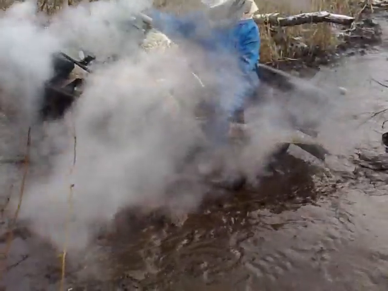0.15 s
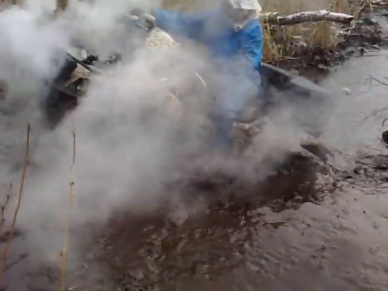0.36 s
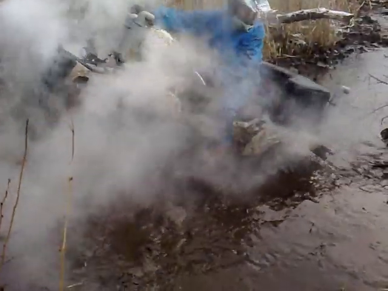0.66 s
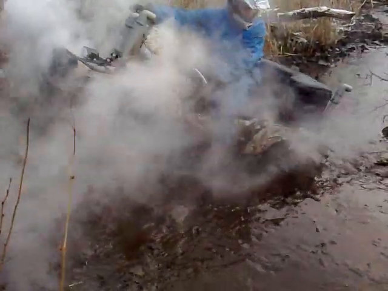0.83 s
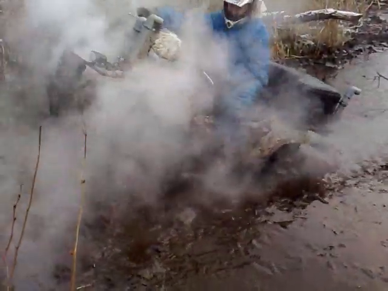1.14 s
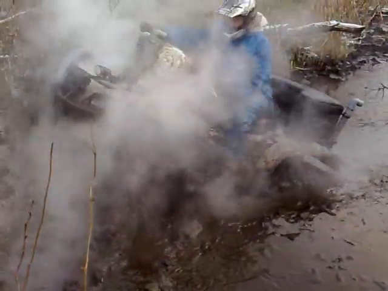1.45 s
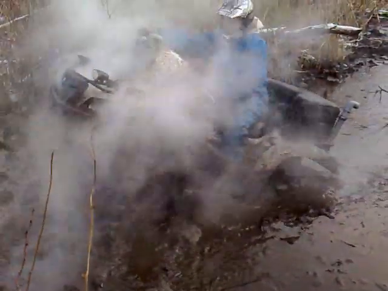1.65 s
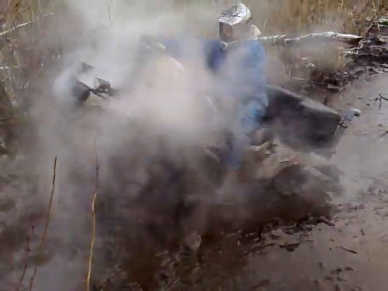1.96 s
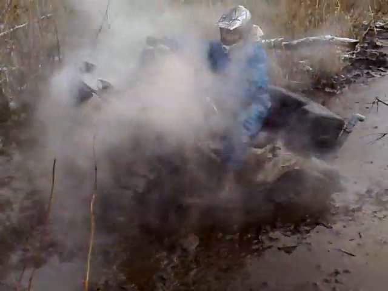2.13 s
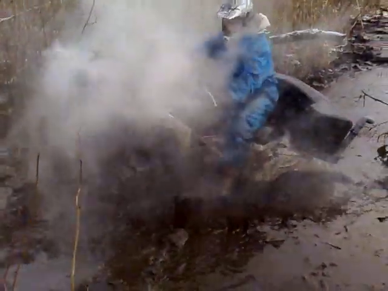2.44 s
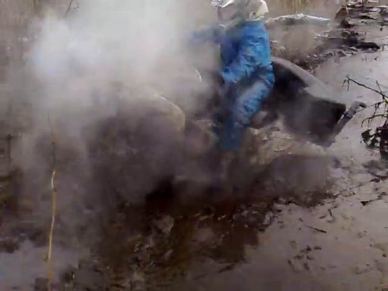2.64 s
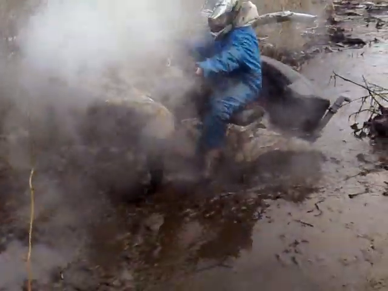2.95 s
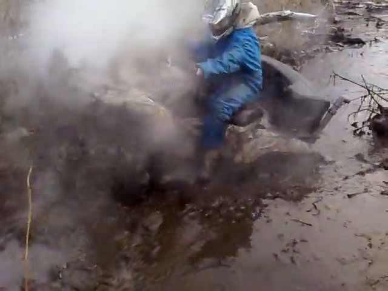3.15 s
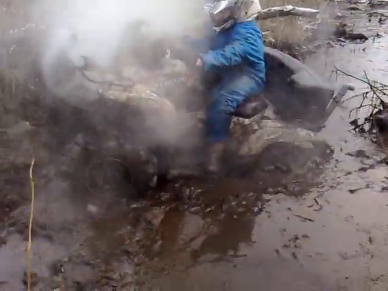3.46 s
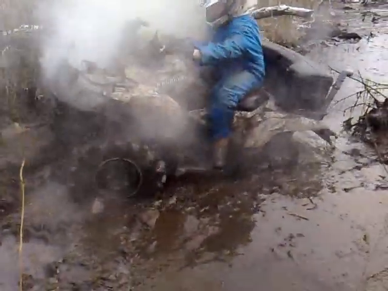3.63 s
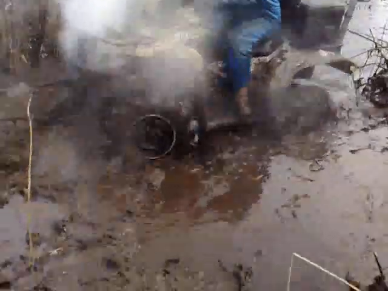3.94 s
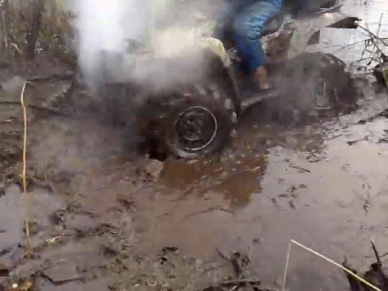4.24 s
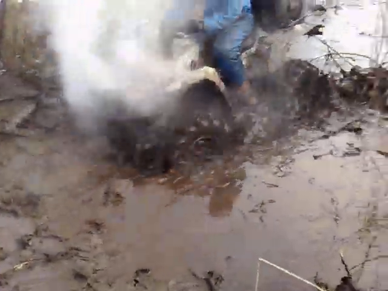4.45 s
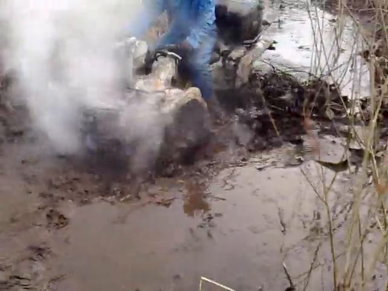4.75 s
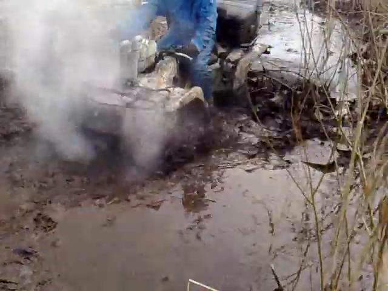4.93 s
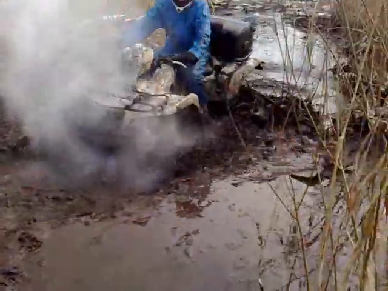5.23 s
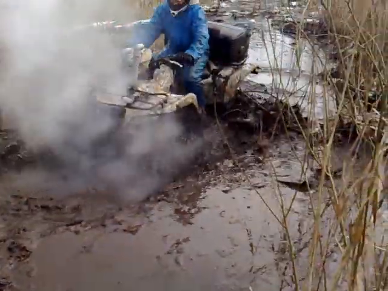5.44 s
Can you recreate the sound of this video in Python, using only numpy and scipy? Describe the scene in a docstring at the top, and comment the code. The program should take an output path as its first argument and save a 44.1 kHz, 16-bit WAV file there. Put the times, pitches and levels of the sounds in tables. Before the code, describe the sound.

A single-cylinder quad bike engine labours with misfires, drops to idle between revs, then pulls steadily as spinning tyres splash through mud.

```python
"""In a muddy forest pool a few metres away, a single-cylinder quad bike is bogged down.
It stutters under load with misfires and sharp bangs, drops to idle, revs once, idles and pulls away.
Each firing sends out a puff of gas that thumps in the silencer, barks in the tail pipe and rasps at
its mouth. Valves, gears and belt clatter, and trunks and banks echo the bark and rasp.
The spinning wheels churn the pool and, at the end, fling mud and water."""
import sys
import numpy as np
from scipy import signal
from scipy.io import wavfile

SR = 44100
rng = np.random.default_rng(int(sys.argv[2]) if len(sys.argv) > 2 else 0)


def bounce(signal):
    """Save signal as a 16-bit WAV file at the path given by the first command-line argument."""
    frames = np.transpose(np.atleast_2d(signal))
    limited = np.clip(frames, -1, 1)
    pcm = np.round(limited * 32767).astype(np.int16)
    wavfile.write(sys.argv[1], SR, pcm)


N = 246519
TIME = np.arange(N) / SR
WORKING_SPEED = 25.46   # firings per second when the engine pulls
ONSET_SAMPLES = int(.022 * SR)   # a burst's level is set over its first 22 ms

# How fast the engine runs. Each row: time in seconds, firings per second.
ENGINE_SPEED = [(0.0, 26.061), (0.404, 25.248), (1.202, 26.117), (1.488, 14.967), (1.87, 13.144),
                (2.029, 23.97), (2.208, 29.184), (2.47, 32.662), (2.61, 21.067), (2.844, 15.293),
                (3.192, 13.433), (3.354, 21.689), (3.534, 25.902), (4.226, 25.73), (4.436, 24.283),
                (4.676, 25.865), (5.6, 25.122)]


def from_db(db):
    """Turns decibels into a factor to multiply a sound by."""
    return 10 ** (np.asarray(db) / 20)


def rms_one(x):
    """Scales a signal so that its average level (rms) is 1."""
    return x / np.sqrt(np.mean(x ** 2) + 1e-20)


def read(rows, times):
    """Looks up each column of a table at the given times, along straight lines between its rows."""
    row_times, *columns = np.transpose(rows)
    return [np.interp(times, row_times, column) for column in columns]


def cut(x, hz, kind, order):
    """Keeps the "low" or the "high" side of a frequency; a higher order cuts more steeply."""
    return signal.sosfilt(signal.butter(order, hz, kind, fs=SR, output="sos"), x)


def coloured(x, spectrum):
    """Gives a noise the tone colour in a table, falling away steeply past its ends; level 1."""
    hz, db = np.transpose(spectrum)
    freqs = np.maximum(np.fft.rfftfreq(N, 1 / SR), 1)
    edges = np.minimum(freqs / hz[0], 1) ** 4 * np.minimum(hz[-1] / freqs, 1) ** 4
    gain = from_db(np.interp(np.log(freqs), np.log(hz), db))
    return rms_one(np.fft.irfft(np.fft.rfft(x) * edges * gain, N))


def drift(per_s):
    """A random wander that heads for a new value per_s times a second; level 1."""
    return rms_one(np.interp(TIME * per_s, np.arange(4096), rng.standard_normal(4096)))


def grains(per_s, spread_db):
    """Random clicks of uneven size; level 1."""
    sizes = from_db(spread_db * np.minimum(rng.exponential(1, N), 4)) * rng.choice([-1, 1], N)
    return rms_one(sizes * (rng.random(N) < per_s / SR))


def resonate(x, notes):
    """Lets a sound ring a set of notes, added with alternating sign; narrow notes ring longer."""
    out = 0
    for k, (hz, width, db) in enumerate(notes):
        decay = np.exp(-np.pi * width / SR)
        gain = (1 - decay ** 2) / 2
        feedback = [1, -2 * decay * np.cos(2 * np.pi * hz / SR), decay ** 2]
        out = out - (-1) ** k * from_db(db) * signal.lfilter([gain, 0, -gain], feedback, x)
    return out


def strike(times, db, shape):
    """Plays a short shape at each time, starting at the level db."""
    clicks = np.zeros(N)
    clicks[np.clip(np.round(times * SR).astype(int), 0, N - 1)] = from_db(db)
    onset_level = np.sqrt(np.mean(shape[:ONSET_SAMPLES] ** 2))
    return signal.fftconvolve(clicks, shape / onset_level)[:N]


def puff(rise_s, fall_s):
    """A quick swell and a slower fall, like the gas flow when the exhaust valve opens."""
    t = TIME[:SR // 3]
    return (1 - np.exp(-(t / rise_s) ** 2)) * np.exp(-t / fall_s)


def speed_octaves(times, base_speed=WORKING_SPEED):
    """Engine speed in octaves (doublings) above a base speed in firings per second."""
    return np.log2(read(ENGINE_SPEED, times)[0] / base_speed)


def firings():
    """The moments when the exhaust valve opens, and which of them are misfires."""
    # Fuel that burns late and weakly. Each entry: time in seconds.
    misfire_times = [.231, .349, .467, .586, .704, .819, .896, .974, 1.053, 1.168]
    cycles = np.cumsum(read(ENGINE_SPEED, TIME)[0]) / SR
    times = np.interp(np.arange(int(cycles[-1]) + 1), cycles, TIME)
    missed = np.abs(times[:, None] - misfire_times).min(axis=1) < .012
    return times - .0028 + rng.normal(0, .00005, len(times)), missed


def throttle_levels(times):
    """The thump comes with the first touch of throttle, the rasp only near wide open."""
    # The rider's throttle. Each row: time in seconds, opening from 0 to 1.
    throttle = [(0.11, 0.55), (0.26, 0.78), (1.21, .89), (1.25, 0.41), (1.53, 0.12), (1.87, 0.21),
                (1.985, 1), (2.33, 1.0), (2.47, 0.74), (2.51, 0.27), (2.64, 0.41), (2.78, 0.06), (3.1, 0.2),
                (3.41, 0.69), (3.8, 0.48), (4.45, 0.52), (4.9, 0.37), (5.59, 0.34)]
    # Strength of a firing. Each row: throttle opening, then base levels in dB of thump, bark and rasp.
    firing_strength = [(0, -31, -43, -67), (.35, -17, -33, -53.5), (.68, -14, -24.5, -39.5),
                       (.87, -16.5, -27, -31.5), (1.0, -14, -23, -32)]
    thump_db, bark_db, rasp_db = read(firing_strength, read(throttle, times)[0])
    # At high speed the cylinder fills less, so the thump shrinks.
    starved_octaves = np.maximum(speed_octaves(times, base_speed=19.23), 0)
    return thump_db - 8 * starved_octaves, bark_db, rasp_db


def thump(times, missed, level_db):
    """Each gas pulse sets the silencer booming; a misfire comes late and booms a little more."""
    # The silencer's notes, main chamber first. Each row: pitch in Hz, width in Hz, relative level in dB.
    silencer_notes = [(114.1, 10.35, 2.5), (235.5, 59.5, -11.5), (170.3, 30, -9.5), (268, 9.7, -17),
                      (63.4, 21, -21.5)]
    # Notes above 200 Hz are strongest as the bike climbs out. Each row: time in seconds, boost in dB.
    upper_boost = [(0.15, 2), (0.35, -0.5), (3.6, -1.5), (4.4, 6), (4.7, -2), (5.59, -2.5)]
    # At idle the piston's exhaust and intake strokes add softer beats.
    # Each row: delay in seconds, share of the thump.
    idle_beats = [(.0092, 0.36), (.027, 0.36)]
    heats = np.log(2) * speed_octaves(times) - 0.077 * missed   # slow or missed firings leave cooler gas
    ragged = np.interp(times, [4.4, 4.7], [.45, 1.8])   # the engine burbles as the wheels grab and slip
    level_db = level_db + 3.64 + 0.52 * missed + ragged * rng.standard_normal(len(times))
    times = times + 0.00766 * missed + 0.00042 * (ragged - .45) * rng.standard_normal(len(times))
    scatter_db = rng.normal(0, 2.4, (len(times), len(silencer_notes)))   # no two firings ring alike
    pulse = puff(rise_s=0.00015, fall_s=0.001)
    out = np.zeros(N + SR)
    for start_s, db, heat, note_db in zip(times, level_db, heats, scatter_db):
        notes = np.array(silencer_notes, float)
        notes[:, 2] += note_db + read(upper_boost, start_s)[0] * (notes[:, 0] > 200)
        notes[0, 0] *= np.exp(0.36 * min(heat, 0))   # sound is slower in cool gas: the main note sinks
        notes[1:, 0] *= np.exp(0.46 * max(heat, 0))   # hot gas lifts the other notes
        notes[0, 2] -= 38 * max(heat - .04, 0)   # fast flow chokes the main chamber
        boom = resonate(pulse, notes)
        boom = from_db(db) * boom / np.std(boom[:ONSET_SAMPLES])
        start = max(int(start_s * SR), 0)
        out[start:start + len(boom)] += boom
        idling = np.clip((-heat - .3) / .3, 0, 1)
        for delay_s, share in idle_beats:
            beat = start + int(delay_s * SR)
            out[beat:beat + len(boom)] += share * idling * boom
    return out[:N]


def bark(times, missed, level_db, rasp_db):
    """Each pulse's steep front rings the tail pipe; swirling gas roars there and cracks in backfires."""
    # The tail pipe's notes. Each row: pitch in Hz, width in Hz, relative level in dB.
    pipe_notes = [(343.5, 18.2, 7), (425.5, 28.4, 3.5), (500.4, 43, 7), (540, 470, 3), (689.4, 30.3, 14.5),
                  (697.4, 88, 5), (966, 107, -6), (1010, 29, -3.5), (1366, 148, 3), (1476, 140, 1.5),
                  (1780, 170, -0.5), (1970, 113, -3)]
    level_db = level_db - 8 * missed + rng.normal(0, .4, len(times))
    front = puff(rise_s=0.000071, fall_s=0.00025)
    ring = cut(resonate(front, pipe_notes), hz=268, kind="high", order=2)
    gas = resonate(rng.standard_normal(N), pipe_notes)
    gas = rms_one(cut(gas, hz=676, kind="high", order=2))
    rush_db = 13 * np.maximum(speed_octaves(times), 0)   # gas rushes harder above working speed
    roar_db = (level_db + rasp_db) / 2 - 4 * missed + rush_db
    roar = gas * strike(times + 0.00033, roar_db, puff(rise_s=0.0037, fall_s=0.0077))
    return strike(times + 0.00159, level_db, ring) + roar + backfires(gas)


def rasp(times, missed, level_db):
    """The jet at the pipe mouth tears into a bright burst at each clean firing; a gentle jet is duller."""
    # The hiss of the jet. Each row: frequency in Hz, relative level in dB.
    jet_colour = [(1180, -93), (2000, -10), (2180, 1), (2320, -11), (2570, -31), (3100, -18), (3410, -9.5),
                  (4490, -2), (5430, -12), (7590, -6.5), (8940, -12.5), (10500, -9.5), (12600, -12),
                  (15600, -19.5)]
    bright_db = level_db - 19 * missed + rng.normal(0, 0.12, len(times))
    dull_db = -23 + 0.43 * bright_db - 6 * missed   # the dull part swings less than the bright part
    bright = coloured(rng.standard_normal(N) + grains(per_s=4000, spread_db=2), jet_colour)
    dull = coloured(rng.standard_normal(N), jet_colour)
    dull = rms_one(cut(dull, hz=5020, kind="low", order=6))
    return (bright * strike(times - 0.0004, bright_db, puff(rise_s=0.0035, fall_s=0.013))
            + dull * strike(times, dull_db, puff(rise_s=0.0006, fall_s=0.014)))


def machinery(times):
    """Valves tick twice a cycle over the churning of gears and belt, all louder at higher speed."""
    # The clatter of the moving parts. Each row: frequency in Hz, relative level in dB.
    clatter_colour = [(190, -37), (320, 18), (746, 8.5), (968, 5.5), (1050, 2), (1240, 4.5), (1320, 3),
                      (1660, 9), (1920, 3), (2220, -0.5), (2410, -8.5), (4470, -2), (5800, -25.5),
                      (6820, -18), (15600, -38)]
    tick_times = np.concatenate([times[:-1] + share * np.diff(times) for share in (.3, .72)])
    ticks = strike(tick_times, rng.normal(-7, 3, len(tick_times)), puff(rise_s=.0004, fall_s=.009))
    noise = rng.standard_normal(N) + 0.77 * grains(per_s=1500, spread_db=-2.5)
    clatter = cut(coloured(noise, clatter_colour), hz=740, kind="high", order=1)
    level_db = -27 + 6.5 * speed_octaves(TIME)
    return from_db(level_db) * clatter * np.sqrt(0.34 + ticks ** 2)


def wheels():
    """Spinning tyres make clods and drops land in clumps under a fine spray; churned water rumbles."""
    # The tyres spin, bite as the bike climbs out, then break loose.
    # Each row: time in seconds, slip from 0 to 1.
    tyre_slip = [(3.2, 0.44), (3.7, 0), (4.15, 0.36), (4.5, 1)]
    # Sloshing mud, hissing spray and rumbling water. Each row: frequency in Hz, relative level in dB.
    mud_colour = [(160, -35), (280, 1.5), (341, -17.5), (418, -1.5), (596, -5.5), (648, -2.5), (1080, -6),
                  (1630, -6), (2140, -16.5), (2600, -32), (3380, -50), (5720, -120)]
    spray_colour = [(1290, -25), (2200, 0.5), (2430, -8.5), (2570, -8), (2960, -7), (3540, -2.5), (4460, 1),
                    (4920, -2), (5430, -11), (6090, -9), (6940, -5), (9410, -11.5), (11600, -7),
                    (13600, -15.5), (15600, -18)]
    rumble_colour = [(20, -33), (32, -24), (45, -22), (75, -7.5), (130, -10.5), (250, -17.5), (500, -77)]
    spin_octaves = speed_octaves(TIME) + np.log2(np.maximum(read(tyre_slip, TIME)[0], .01))
    mud_db, spray_db = splash_levels(churn_db=-30 + 4.5 * spin_octaves)
    clumps = drift(per_s=51)
    clods = grains(per_s=1800, spread_db=1.5) + 0.54 * rng.standard_normal(N)
    mud = coloured(clods, mud_colour) * from_db(mud_db + 1.87 * clumps)
    drops = grains(per_s=6700, spread_db=-2) + 0.34 * rng.standard_normal(N)
    spray = coloured(drops, spray_colour) * from_db(spray_db + 1.63 * clumps)
    rumble = coloured(rng.standard_normal(N), rumble_colour) * (from_db(-29.5) + from_db(mud_db - 5.5))
    return mud + spray + rumble


def forest(x):
    """Adds the dull echoes that trunks and banks throw back."""
    # The echoes. Each row: delay in seconds, level in dB.
    echoes = [(.008, -11), (.021, -12), (0.045, -17.5), (.083, -42)]
    dull = cut(x, hz=4570, kind="low", order=1)
    return x + sum(from_db(db) * np.interp(TIME - delay_s, TIME, dull, left=0) for delay_s, db in echoes)


def backfires(gas):
    """Unburnt fuel goes off with a sharp crack: a sudden burst of the pipe's gas noise."""
    # The bangs. Each row: start in seconds, level in dB.
    bangs = [(0.857, -28), (0.933, -32), (1.132, -30), (3.25, -26)]
    times, level_db = np.transpose(bangs)
    return gas * strike(times, level_db, puff(rise_s=0.00045, fall_s=0.0098))


def splash_levels(churn_db):
    """Mud and spray levels in dB: loads flung by the tyres swell and rain down on top of the churn."""
    # The splashes. Each row: peak time in seconds, fade time in seconds, mud in dB, spray in dB.
    splashes = [(4.03, 0.047, -48, -40), (4.458, 0.041, -46, -32.5), (4.624, 0.22, -23.5, -29),
                (5.004, 0.15, -24.5, -28), (5.36, 0.13, -37, -38.5), (5.551, 0.33, -29.5, -33.5)]
    rise_share = 0.81   # swelling time as a share of the fade time
    mud, spray = from_db(churn_db), 1e-9
    for peak_s, fade_s, mud_db, spray_db in splashes:
        age = (TIME - peak_s) / fade_s
        swell = np.exp(-(np.minimum(age, 0) / rise_share) ** 2 - np.maximum(age, 0))
        mud = np.hypot(mud, from_db(mud_db) * swell)
        spray = np.hypot(spray, from_db(spray_db) * swell)
    return 20 * np.log10([mud, spray])


def scene():
    """Adds exhaust, machinery and wheels into one channel; only the bark and rasp echo."""
    times, missed = firings()
    thump_db, bark_db, rasp_db = throttle_levels(times)
    silencer = thump(times, missed, thump_db)
    tail_pipe = bark(times, missed, bark_db, rasp_db) + rasp(times, missed, rasp_db)
    return (silencer + forest(tail_pipe) + machinery(times) + wheels())[None]


def record(dry):
    """The microphone rounds off the loudest peaks, and the highest treble is cut."""
    peak_limit, cutoff_hz = 0.92, 15850
    rounded = peak_limit * np.tanh(dry / peak_limit)
    return signal.sosfilt(signal.ellip(12, .1, 90, cutoff_hz, fs=SR, output="sos"), rounded)


dry = scene()
out = record(dry)
bounce(out)
```